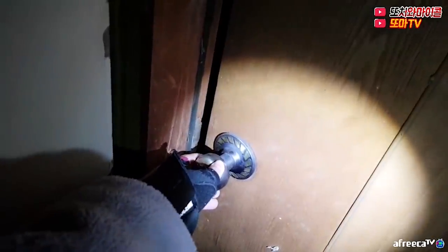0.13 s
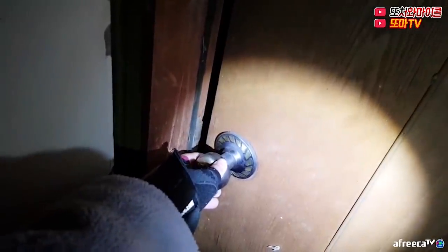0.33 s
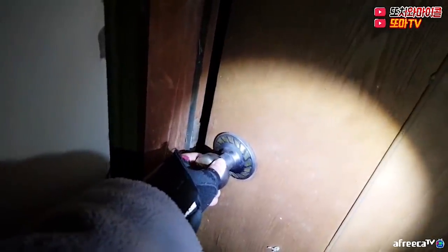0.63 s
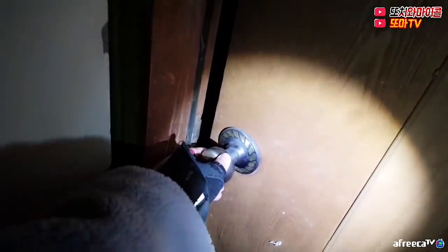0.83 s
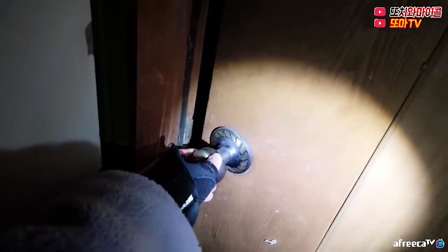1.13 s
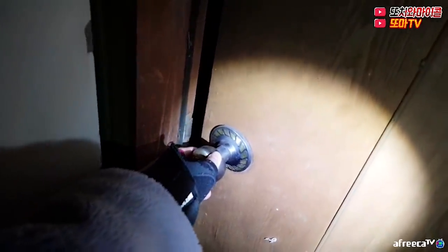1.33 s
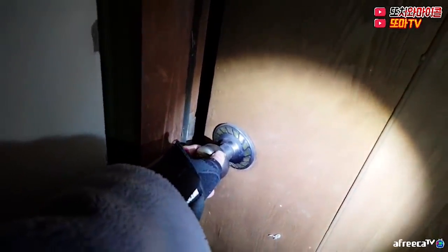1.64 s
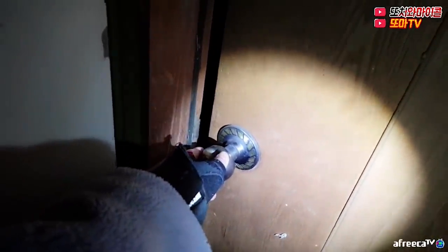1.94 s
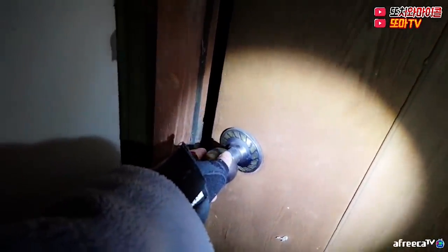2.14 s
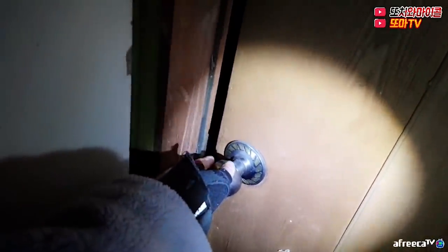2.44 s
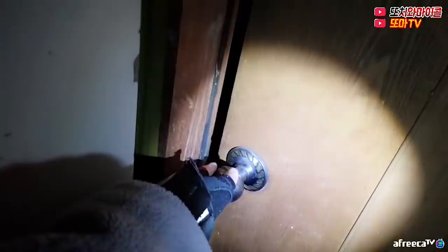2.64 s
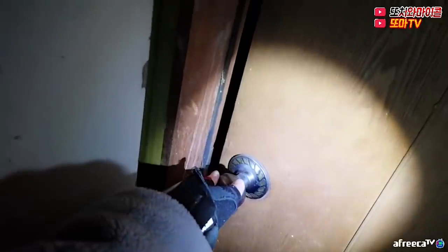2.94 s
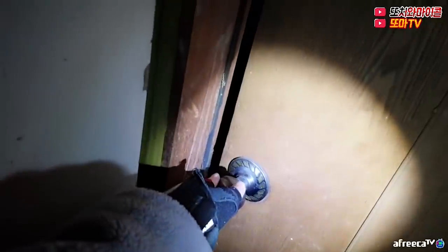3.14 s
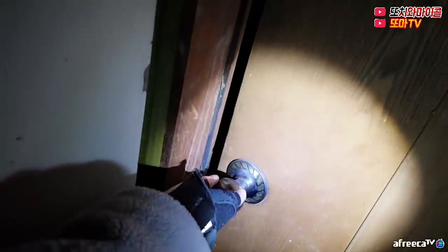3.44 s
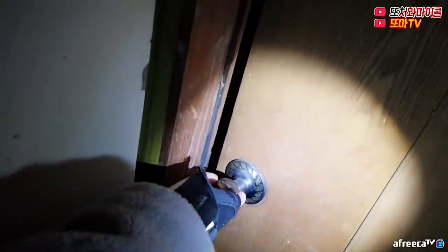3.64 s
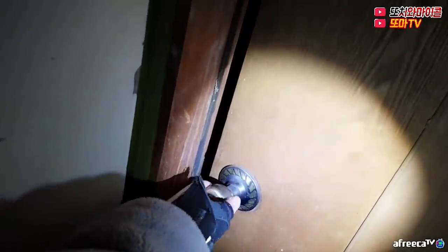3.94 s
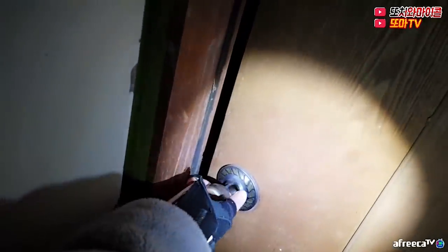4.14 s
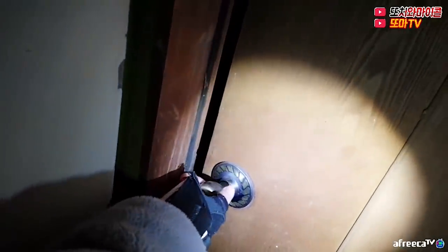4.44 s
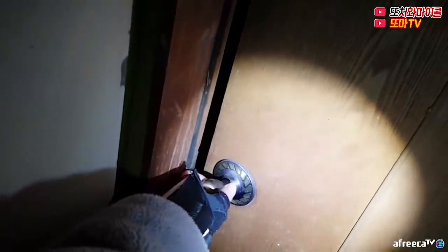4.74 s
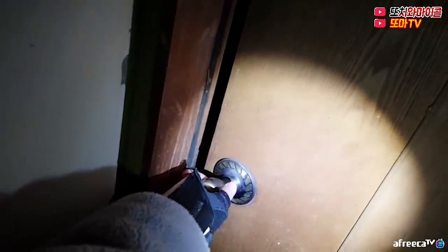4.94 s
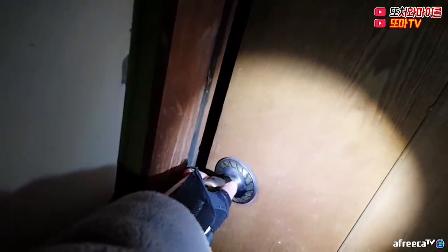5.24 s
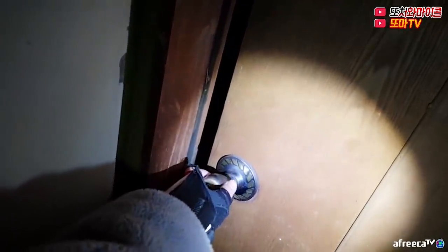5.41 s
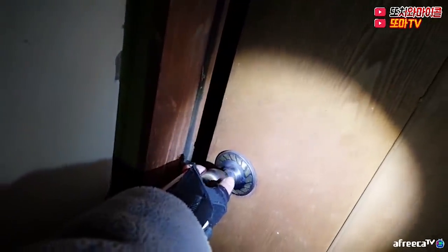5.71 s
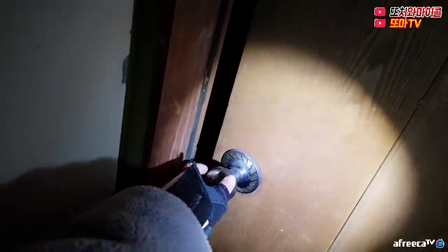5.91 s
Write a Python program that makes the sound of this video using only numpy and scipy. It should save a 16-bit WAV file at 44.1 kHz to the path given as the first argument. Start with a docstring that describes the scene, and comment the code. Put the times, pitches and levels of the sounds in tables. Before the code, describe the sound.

After half a second of low handling rumble, a metal latch snaps and grinds past its plate while a hollow wooden door jerks and shudders deeply. A loose knob clacks with a thin ring. Then come quieter bumps, small lock ticks, two short ratcheting turns and cloth rustle, ending with a firmer knob rattle. Close microphone, bare echoing room, faint hiss.

```python
"""Loose knob on a stuck door

In a bare room a latch snaps and grinds past its plate, a wooden door jerks free and shudders, the knob clacks;
bumps, ticks of the lock and slow ratcheting turns follow, a sleeve rustles close by, over rumble and hiss.
Blows are decaying noise bands, most with ringing sine modes; the shudder is one wavering low sine;
cloth, scuffs and background are coloured noise; slides are random slips that excite the metal."""
import sys
import numpy as np
from scipy import signal
from scipy.io import wavfile

SR = 44100
rng = np.random.default_rng(int(sys.argv[2]) if len(sys.argv) > 2 else 0)


def dump(signal):
    """Clip the signal to [-1, 1] and save it as 16-bit WAV at the path in sys.argv[1]."""
    limited = np.clip(np.atleast_2d(signal).T, -1, 1)
    pcm = np.round(limited * 32767).astype(np.int16)
    wavfile.write(sys.argv[1], SR, pcm)


N = 267586
TIME = np.arange(N) / SR
AGE = TIME[:SR // 2]   # time since a blow; every blow is over after 0.5 s

# third-octave filter bank
EDGES = 22 * 2 ** (np.arange(28) / 3)
CENTRES = np.sqrt(EDGES[1:] * EDGES[:-1])
BANK = [signal.butter(2, pair, "band", fs=SR, output="sos") for pair in zip(EDGES, EDGES[1:])]

# latch bolt hitting its plate: t/s, level/dB, brightness/(dB per octave), contact bandwidth f/Hz
LATCH_HITS = [(.562, -45.5, 3, 3970), (0.59, -27, -0.5, 8600), (.658, -36.5, -1, 9300),
              (.702, -33.5, 5.5, 3760), (.752, -46.5, -2, 4250), (0.7945, -38.5, -4.5, 5500)]
# loose knob hitting its stops: t/s, level/dB, brightness/(dB per octave), shell ring level/dB, grip/(0-1)
KNOB_HITS = [(.957, -31.5, -0.5, -21, 0.07), (1.3599, -39.5, -1.3, -18.5, 0.16), (1.751, -46, -2, -27, 0.5),
             (2.523, -46, -1, -7, 1), (2.609, -53.5, -2.5, -24, 0.9), (4.4539, -49, -3.5, -27, 1),
             (4.653, -60.5, -4.5, -31, 0.7), (5.167, -49.5, -2, -14, 0.88), (5.2, -38.5, -1.2, -7.5, 0.96),
             (5.2416, -44.5, -2.2, -20, 0.95)]
# crowd of short-lived modes of bolt and plate: f/Hz, level per Hz/dB
LATCH_COLOUR = [(150, -10), (400, -0.5), (900, 1.5), (2000, -4.5), (2700, -4), (3700, 0), (4800, -9),
                (6200, -4.5), (8000, -11), (10500, -12.5)]


def amp(db):
    """Turn decibels into an amplitude factor."""
    return 10 ** (np.asarray(db) / 20)


def unit_energy(x):
    """Scale a sound to a summed square of 1."""
    return x / np.sqrt(np.sum(x ** 2) + 1e-20)


def at_hz(points, hz):
    """Read a spectrum between its points, along log frequency."""
    table = np.array(points)
    return np.interp(np.log(hz), np.log(table[:, 0]), table[:, 1])


def add(track, s, sound):
    """Mix a sound in at time s."""
    start = round(s * SR)
    track[start:start + len(sound)] += sound[:N - start]


def drift(rate):
    """Random wandering around 0 with a spread near 1, through `rate` new values per second."""
    knots = rng.standard_normal(int(N / SR * rate) + 2)
    return np.interp(TIME * rate, np.arange(len(knots)), knots)


def banded(band_db, envelopes):
    """Third-octave bands of noise, each under its own envelope; unit energy."""
    white = rng.standard_normal((2, len(envelopes[0])))
    gains = amp(band_db) * np.sqrt(CENTRES)   # level per Hz times bandwidth
    total = 0
    for k, sos in enumerate(BANK):
        # neighbouring bands take different noise
        band = signal.sosfilt(sos, white[k % 2] * envelopes[k])
        total = total + gains[k] * unit_energy(band)
    return unit_energy(total)


def dying(t60):
    """One exponential decay for each t60 (time to fall by 60 dB)."""
    return np.exp(-np.log(1000) * AGE / np.maximum(t60, 1e-3)[:, None]) + 1e-9


def steady(colour, grain=1):
    """Noise of rms 1 with this spectrum, falling 24 dB per octave beyond its ends."""
    nearest = np.clip(CENTRES, colour[0][0], colour[-1][0])
    octaves_beyond = np.abs(np.log2(CENTRES / nearest))
    envelopes = [np.ones(N) * grain] * len(BANK)
    return np.sqrt(N) * banded(at_hz(colour, CENTRES) - 24 * octaves_beyond, envelopes)


def crowd(colour, tilt_db, t60, damping):
    """Dense modes after a blow; t60 holds at 1 kHz and shortens with pitch."""
    khz = CENTRES / 1000
    return banded(at_hz(colour, CENTRES) + tilt_db * np.log2(khz), dying(t60 * khz ** -damping))


def ringing(modes, tilt_db, scatter_db=2):
    """Clear modes after a blow, each struck with a strength and sign of its own."""
    hz, db, t60 = np.transpose(modes)
    strengths = amp(db + tilt_db * np.log2(hz) + scatter_db * rng.standard_normal(len(hz)))
    gains = strengths * rng.choice([-1, 1], len(hz))
    return unit_energy(gains @ (dying(t60) * np.sin(2 * np.pi * hz[:, None] * AGE)))


def blow(db, sound):
    """Give a blow the energy of 20 ms at this level."""
    return amp(db) * np.sqrt(SR / 50) * unit_energy(sound)


def contact(sound, top_hz):
    """A softer, longer contact cannot excite the high modes: low-pass."""
    return signal.sosfilt(signal.butter(4, top_hz, fs=SR, output="sos"), sound)


def background():
    """Handling rumble that rises and falls, over a steady microphone hiss."""
    # handling: t/s, rumble level/dB
    handling = [(0, -53), (1.5, -49.5), (2.6, -56), (3.2, -53), (4.6, -54), (5.3, -48.5), (6.07, -49)]
    # spectrum of the rumble: f/Hz, level per Hz/dB
    rumble_colour = [(28, -4), (37, -3.5), (55, 4), (72, -11), (100, -13), (150, -18), (220, -29),
                     (400, -37)]
    # spectrum of the hiss: f/Hz, level per Hz/dB
    hiss_colour = [(200, 2), (350, -6), (700, -5.5), (1400, -6.5), (2200, -9.5), (4800, -4), (7500, -4),
                   (10400, -14)]
    rumble_db = np.interp(TIME, *np.transpose(handling))
    return amp(rumble_db) * steady(rumble_colour) + amp(-68) * steady(hiss_colour)


def scuffs():
    """The body scuffs softly against the door; each scuff swells and fades without a sharp edge."""
    # scuffs: middle t/s, half length t/s, level at the middle/dB
    strokes = [(0.379, 0.037, -61), (0.568, 0.026, -44.5), (2.13, 0.02, -58.5), (3.347, 0.017, -62.5),
               (3.88, 0.064, -61.5), (5.172, 0.049, -54.5), (5.312, 0.013, -49), (5.751, 0.037, -50.5)]
    # spectrum of a scuff: f/Hz, level per Hz/dB
    scuff_colour = [(120, 2), (300, -1), (500, -12.5), (750, -11.5), (1200, -18), (2000, -34.5),
                    (4000, -29)]
    swell = sum(amp(db) * np.exp(-((TIME - s) / half) ** 2) for s, half, db in strokes)
    return steady(scuff_colour) * swell


def latch_ring(tilt_db):
    """Bolt and plate: a hard crack and a short metallic ring."""
    # clear modes of bolt and plate: f/Hz, level/dB, t60/s
    latch_modes = [(1547, -3, 0.054), (1860, -22, 0.033), (2408, 1, 0.073), (3220, -6, 0.099),
                   (3930, 1, 0.011), (4310, -9, 0.04), (5400, 4, 0.039), (6190, 13, 0.026),
                   (7600, 2, 0.055)]
    crack = amp(-7) * crowd(LATCH_COLOUR, tilt_db, t60=0.012, damping=0.22)
    body = crowd(LATCH_COLOUR, tilt_db, t60=0.12, damping=0.87)
    return crack + body + amp(-9.0) * ringing(latch_modes, tilt_db)


def grind(length_s, db, tilt_db, slips_per_s=600):
    """Metal slides over metal in tiny uneven slips, each exciting the short-lived modes."""
    length = max(round(length_s * SR), 2)
    is_slip = rng.random(len(AGE)) < slips_per_s / SR
    slips = is_slip * (2 * rng.random(len(AGE)) - 1)
    response = crowd(LATCH_COLOUR, tilt_db, t60=0.039, damping=0.11)
    sound = signal.fftconvolve(slips[:length], response)
    return amp(db) * np.sqrt(length) * unit_energy(sound)


def latch():
    """The bolt knocks against its plate and slides over it."""
    # metal sliding on metal: start t/s, end t/s, level/dB, brightness/(dB per octave)
    slides = [(0.598, 0.65, -41, -4.5), (0.632, 0.682, -38, -1.5), (0.705, 0.784, -44.5, -5.5),
              (0.812, 0.92, -52.5, -4)]
    out = np.zeros(N)
    for s, db, tilt_db, top_hz in LATCH_HITS:
        add(out, s, blow(db, contact(latch_ring(tilt_db), top_hz)))
    for start, end, db, tilt_db in slides:
        add(out, start, grind(end - start, db, tilt_db))
    return out


def boom(db, tilt_db, top_hz):
    """One blow on the hollow wooden leaf: dense modes and clear low ones."""
    # crowd of short-lived modes of the leaf: f/Hz, level per Hz/dB
    door_colour = [(35, -15), (60, -2.5), (100, -2), (170, 0.5), (300, -8.5), (500, -11.5), (850, -12),
                   (1400, -27), (3000, -36.5), (10000, -42.5)]
    # clear modes of the leaf: f/Hz, level/dB, t60/s
    door_modes = [(96, 1, .4), (128, -4, .4), (158, 2, .5), (205, -2, .35), (252, -3, .25), (287, 2, .32),
                  (326, -4, .3), (378, -9, .25), (436, -8, .27), (548, -11, .2), (603, -12, .2),
                  (752, -13, .2), (850, -13, .2)]
    body = crowd(door_colour, tilt_db, t60=0.15, damping=0.22)
    return blow(db, contact(body + ringing(door_modes, tilt_db), top_hz))


def door(count=3):
    """The leaf booms at each bump, chatters in its frame ever weaker and sparser, and answers bolt and knob."""
    # bumps: t/s, level/dB, brightness/(dB per octave), contact bandwidth f/Hz, first rebound re bump/dB
    bumps = [(0.629, -24.5, -10.5, 188, -11), (0.7011, -24.5, 4, 740, -5.5), (.900, -29.5, -10, 187, -18),
             (0.955, -25.5, -7, 118, -23), (1.731, -44, -1, 298, -8), (1.7545, -31, 1, 5100, -4.5),
             (3.338, -50, -3, 490, -8.5), (3.522, -37.5, -5.5, 200, -27), (3.548, -40.5, 2.5, 210, -25),
             (3.8258, -52.5, -7.5, 1100, -7.5), (5.325, -43, -3, 206, -11.5), (5.529, -49.5, 3, 161, -16.5)]
    gap_s, gap_growth, loss_db = .0145, 1.9, 4.5   # first gap, then growth and loss from rebound to rebound
    # brightness per octave, bandwidth of the first rebound, share of the bandwidth left for the next
    rebound_tilt_db, rebound_hz, softening = 4.5, 456, 0.67
    delays = np.cumsum(gap_s * gap_growth ** np.arange(count))
    out = np.zeros(N)
    for s, db, tilt_db, top_hz, rebound_db in bumps:
        add(out, s, boom(db, tilt_db, top_hz))
        for k, delay in enumerate(delays):
            level_db = db + rebound_db - k * loss_db
            add(out, s + delay, boom(level_db, rebound_tilt_db, rebound_hz * softening ** k))
    # what bolt and knob pass into the wood
    for s, db, *_ in LATCH_HITS:
        add(out, s, boom(db + 5, tilt_db=-4, top_hz=1710))
    for s, db, *_ in KNOB_HITS:
        add(out, s, boom(db - 14, tilt_db=8, top_hz=1500))
    return out


def shudder(hz=40.44, attack_s=.035, waver=0.0625):
    """Shoves swing the leaf in its lowest mode, hold it and let it die; the grip of the hand bends its pitch."""
    # shoves: t/s, time held after the attack/s, level/dB, t60/s
    shoves = [(.612, 0.028, -19.5, 0.14), (.765, 0.083, -25, 0.27), (0.919, 0.028, -26, 0.91),
              (1.735, 0.084, -43.5, 0.65), (3.507, 0.019, -35.5, 0.38), (3.66, 0.015, -44, 0.4)]
    swing = np.zeros(N)
    for s, held, db, t60 in shoves:
        rise = np.clip((TIME - s) / attack_s, 0, 1)
        since_release = np.maximum(TIME - s - attack_s - held, 0)
        swing += rise * amp(db - 60 * since_release / t60)
    phase = 2 * np.pi * np.cumsum(hz * (1 + waver * drift(9.6))) / SR
    return swing * np.sqrt(2) * np.sin(phase)


def shell(t60):
    """Two nearly equal shell modes beat as they die, starting half cancelled."""
    # modes of the knob's shell: f/Hz, signed strength
    shell_modes = [(4178, 1), (4184, -.5)]
    note = sum(size * np.sin(2 * np.pi * hz * AGE) for hz, size in shell_modes)
    return unit_energy(amp(-60 * AGE / max(t60, .01)) * note)


def clack(tilt_db, shell_t60, grip):
    """Knob on spindle: a crack and a hollow body, shorter under the hand."""
    # crowd of short-lived modes of the knob: f/Hz, level per Hz/dB
    knob_colour = [(120, 0), (300, -3), (550, -10), (850, 2.5), (1250, -5), (1750, 2), (2300, -4.5),
                   (3100, -4.5), (4200, -14.5), (5000, -17), (7000, -20.5), (10500, -34)]
    # clear modes of the knob, free of the hand: f/Hz, level/dB, t60/s
    knob_modes = [(433, -8, .35), (602, -7, .2), (651, -14, .3), (775, -6, .1), (845, 0, .2),
                  (960, -10, .28), (1034, -11, .25), (1175, -9, .25), (1524, -8, .17), (1707, -4, .22),
                  (1800, 0, .06), (1870, -3, .14), (2190, -7, .15), (2515, -6, .09), (3070, -3, .11),
                  (3720, -11, .1), (5430, -18, .1)]
    grip_loss_db_per_s = 301   # extra loss in a firm hand
    crack = amp(-6) * crowd(knob_colour, tilt_db, t60=0.021, damping=.1)
    body = crowd(knob_colour, tilt_db, t60=0.085 + 0.036 * shell_t60, damping=0.55)
    modes = unit_energy(ringing(knob_modes, tilt_db) * amp(-grip_loss_db_per_s * grip * AGE))
    return unit_energy(crack + body + amp(-4.0) * modes)


def knob(bounce_s=.0168):
    """The knob clacks and its shell sings one high note; a grip shortens the note and weakens the bounce."""
    free_t60, gripped_t60 = 0.53, 0.079   # ring of the shell, s
    out = np.zeros(N)
    for s, db, tilt_db, shell_db, grip in KNOB_HITS:
        free = 1 - grip
        shell_t60 = gripped_t60 + free * (free_t60 - gripped_t60)
        strike = clack(tilt_db, shell_t60, grip) + amp(shell_db) * shell(shell_t60)
        add(out, s, blow(db, strike))
        # a knob that is let go strikes twice
        add(out, s + bounce_s, free * blow(db, clack(tilt_db, shell_t60, grip)))
    return out


def tick(tilt_db, t60):
    """A small steel part clicks and rings briefly."""
    # crowd of short-lived modes of small lock parts: f/Hz, level per Hz/dB
    tick_colour = [(200, -19), (700, -6.5), (1400, 5), (2000, -13.5), (2600, 4.5), (3400, -5.5),
                   (4300, 2.5), (5700, -3), (7500, -2.5), (10500, -18)]
    # clear modes of small lock parts: f/Hz, level/dB, t60/s
    tick_modes = [(1444, -2.5, 0.1), (2470, -3, 0.05), (4450, 5, 0.072), (5360, 15.5, 0.015),
                  (6260, 8, 0.045)]
    return crowd(tick_colour, tilt_db, t60, damping=0.33) + amp(-5.0) * ringing(tick_modes, tilt_db)


def ticks():
    """Spring and spindle click singly as the knob is eased round."""
    # clicks: t/s, level/dB, brightness/(dB per octave), contact bandwidth f/Hz
    clicks = [(1.3, -60.5, 0.5, 9300), (1.9739, -56.5, 1, 1700), (2.676, -55, 2, 6900),
              (2.848, -57, 3, 6600), (3.107, -57.5, 2, 7100), (3.369, -54.5, 0, 7100),
              (6.002, -46, 7.5, 10200)]
    out = np.zeros(N)
    for s, db, tilt_db, top_hz in clicks:
        add(out, s, blow(db, contact(tick(tilt_db, t60=0.11), top_hz)))
    return out


def sleeve(grain_db=2.5):
    """Cloth drags on cloth, swelling and fading with each stroke: a dull rub and a finely grained hiss."""
    # strokes of the arm: start t/s, length t/s, rub level/dB, hiss level/dB
    strokes = [(1.402, 0.4, -65, -70), (1.693, .5, -64, -65), (2.0, 0.49, -65, -73),
               (3.48, 1.0, -67.5, -64.5), (5.1, 0.64, -61.5, -61.5), (5.65, 0.57, -83, -64)]
    # dull rub of cloth: f/Hz, level per Hz/dB
    rub_colour = [(100, -4), (250, -1.5), (500, -3), (900, -3.5), (1400, -3), (2200, -17.5), (4000, -18)]
    # fine hiss of cloth: f/Hz, level per Hz/dB
    fibre_colour = [(900, -29), (2000, -4.5), (3500, 1.5), (6000, -2), (8000, -5), (10500, -29)]
    start, length, rub_db, hiss_db = np.transpose(strokes)
    progress = (TIME - start[:, None]) / length[:, None]
    speed = np.interp(progress, [0, 0.33, 1], [0, 1, 0])   # a third of the stroke gathers speed
    rub = amp(rub_db) @ speed * steady(rub_colour, amp(grain_db * drift(90)))
    fibres = amp(hiss_db) @ speed * steady(fibre_colour, amp(grain_db * drift(300)))
    return rub + fibres


def turns(count=8, top_hz=6500):
    """Each slow turn grinds the spindle and ratchets the spring in an even run of ticks."""
    # turns: start t/s, first tick level/dB, tick brightness/(dB per octave), grinding level/dB
    knob_turns = [(2.079, -62.5, -1.5, -66.5), (2.4748, -59, 1, -65)]
    gap_s, growth_db, scatter_db = .0193, 0.36, 0.5   # tick to tick, growing as the spring tightens
    out = np.zeros(N)
    for start, db, tilt_db, grind_db in knob_turns:
        add(out, start, grind(.145, grind_db, tilt_db=-2))
        for k in range(count):
            tick_db = db + k * growth_db + scatter_db * rng.standard_normal()
            click = contact(tick(tilt_db, t60=.055), top_hz)
            add(out, start + k * gap_s, blow(tick_db, click))
    return out


def room(x, gap_s=0.0028):
    """Bare walls answer after a short gap with a diffuse tail."""
    # spectrum of the tail: f/Hz, level per Hz/dB
    room_colour = [(40, -6), (150, 3), (400, -0.5), (1000, 4), (2500, -1.5), (5000, -1.5), (10000, -1)]
    # decay of the tail: f/Hz, t60/s
    room_t60 = [(100, 1), (400, 0.63), (1000, 0.4), (3000, 0.5), (10000, 0.42)]
    envelopes = dying(at_hz(room_t60, CENTRES)) * (AGE > gap_s)
    tail = banded(at_hz(room_colour, CENTRES), envelopes)
    return signal.fftconvolve(x, tail)[:N]


def scene():
    """Lock and door, close by, echo in a bare room; shudder, sleeve and background stay dry."""
    metal = latch() + knob() + ticks() + turns()
    wood = door() + scuffs()
    echo = room(amp(-14) * metal + amp(-15.5) * wood)
    return (metal + wood + echo + shudder() + sleeve() + background())[None]


def record(dry):
    """A steep low-pass cuts the top above 10.5 kHz."""
    return signal.sosfilt(signal.ellip(10, .3, 70, 10500, fs=SR, output="sos"), dry)


dry = scene()
out = record(dry)
dump(out)
```